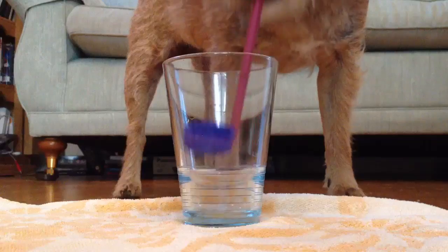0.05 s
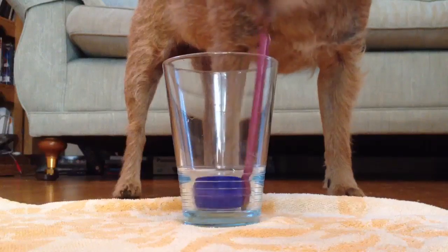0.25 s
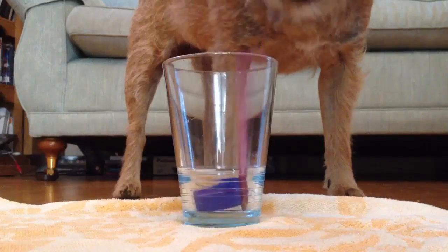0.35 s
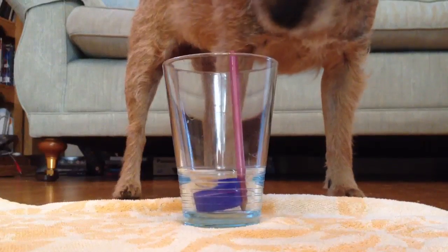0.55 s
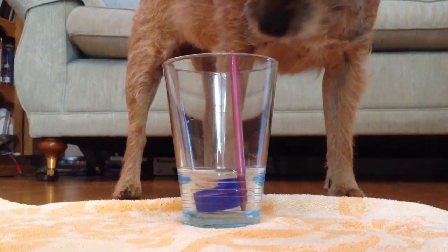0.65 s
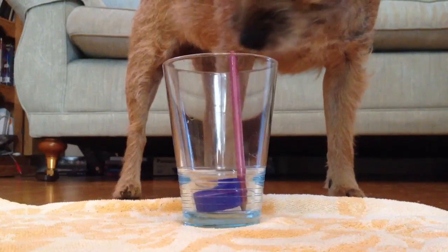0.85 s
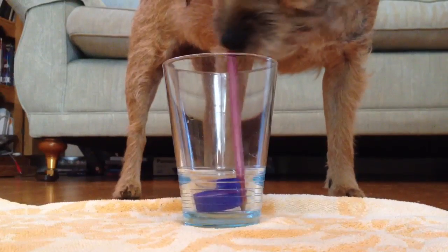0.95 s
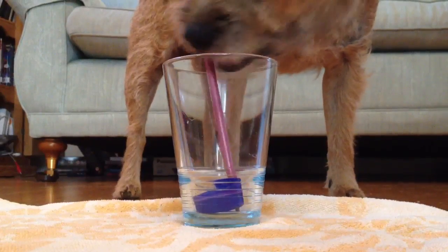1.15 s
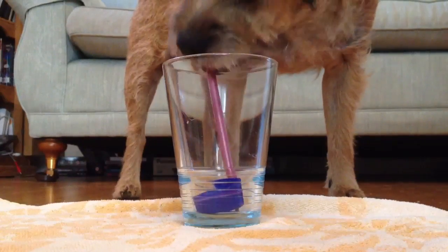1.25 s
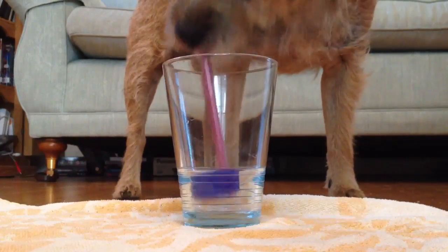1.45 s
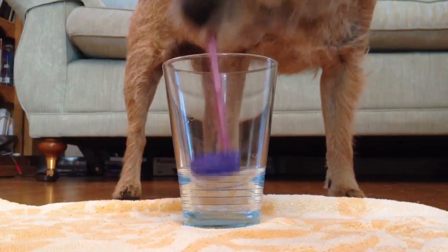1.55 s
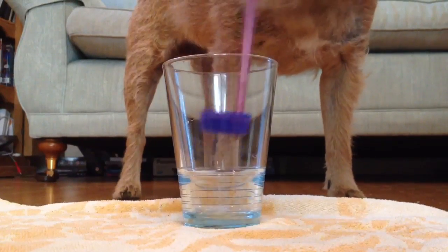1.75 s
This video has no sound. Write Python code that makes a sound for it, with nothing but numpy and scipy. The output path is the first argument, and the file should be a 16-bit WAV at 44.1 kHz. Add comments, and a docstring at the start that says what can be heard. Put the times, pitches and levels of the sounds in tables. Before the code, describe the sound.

A drinking glass clinks brightly at about 0.2 and 0.3 seconds as a plastic stirrer drops in, with hollow rattling, a faint fizz of water and a soft thud. The ringing fades by about 0.8 seconds. A softer clink comes at 1.1 seconds. From 1.4 to 1.8 seconds the stirrer scrapes and ticks lightly up the glass. The sound is close, in a quiet room.

```python
"""A plastic-stemmed stirrer clinks three times against a drinking glass and makes its wall ring. It slides down
the wall with a faint, high fizz, rattles, thuds on the bottom and is drawn out with a light scrape. Each clink
and knock also rings the air in the glass, a short hollow note. The glass stands on a towel, close to the
microphone in a quiet living room."""
import sys
import numpy as np
from scipy import signal
from scipy.fft import rfft, irfft
from scipy.io import wavfile

SR = 44100
rng = np.random.default_rng(int(sys.argv[2]) if len(sys.argv) > 2 else 0)


def digitize_waveform(pressure):
    """Quantize a signal to 16-bit integers and store it at the path in sys.argv[1].

    Rows of a 2-D input are taken as channels; values are limited to [-1, 1].
    """
    field = np.atleast_2d(pressure).T
    bounded = np.clip(field, -1, 1)
    quanta = np.round(bounded * 32767).astype(np.int16)
    wavfile.write(sys.argv[1], SR, quanta)


N = 79380
T = np.arange(N) / SR


def clinks():
    """The struck wall rings with many tones; the spot hit sets two of them, and a soft touch is duller."""
    # hits: t/s, level/dB, lowest tone boost/dB, overtone boost/dB, treble tilt/(dB per kHz), ring time factor
    hits = [(.2011, -0.5, -13.5, 15.5, -0.06, 0.86), (0.3148, 0.5, 2.5, -5, 0.5, 1.007),
            (1.118, -15, 5, 14, -1, 0.91)]
    # tones of the wall, some in close pairs that waver: f/Hz
    glass_hz = [1963.6, 4103.5, 4108.5, 6789, 7348, 8985, 10168, 10143, 12458, 13579, 14109, 14767]
    # strength of each tone: level/dB
    glass_db = [-18, -9.5, -26.5, -20.5, -43, -35, -35, -36.5, -39.5, -45, -31.5, -49]
    # time each tone takes to fade by 60 dB: t60/s
    glass_t60 = [0.63, .29, 0.23, 0.22, 0.288, 0.17, 0.1275, .12, .1, .11, .075, .1]
    # tone colour of the crack at contact: f/Hz, level/dB
    crack_colour = [(300, -20), (800, -8), (1500, -9), (2800, -5.5), (4200, -14), (5400, -8), (7000, -7.5),
                    (10000, -10), (11500, -28), (15000, -27.5)]
    overtone_hz, twin_gap_hz, attack_s = 7348, 2.8, .00025
    out, hz = np.zeros(N), np.array(glass_hz)
    for start, db, low_db, overtone_db, tilt_db, length in hits:
        tilt = lambda f: tilt_db * (f - 4000) / 1000
        levels = np.array(glass_db) + tilt(hz) + low_db * (hz < 3000) + overtone_db * (hz == overtone_hz)
        wall = ring(zip(hz, levels, length * np.array(glass_t60)))
        # a weaker twin of opposite sign makes the lowest tone hold before it fades
        wall -= ring([(hz[0] + twin_gap_hz, levels[0] - 14, length * glass_t60[0])])
        wall *= 1 - np.exp(-T / attack_s)
        crack = undb(-22.5) * burst([(f, level + tilt(f)) for f, level in crack_colour], t60=.038)
        clink = highpass(wall + crack, hz=1400) + undb(-32.5) * air(hz=790)
        out += place(undb(db) * clink, start)
    return out


def knocks():
    """The plastic rattles in dry clicks, each ringing the air in the glass and the stirrer's disc."""
    # knocks: t/s, click level/dB, click centre f/Hz, click t60/s, hollow note level/dB, note f/Hz
    hits = [(.117, -50, 6340, 0.0067, -47.5, 774), (.136, -54, 8200, 0.03, -62, 800),
            (.2215, -30.5, 2500, 0.051, -26, 790), (0.2424, -29, 3100, 0.013, -69, 775),
            (.2668, -28, 2600, 0.046, -16, 820), (.291, -28, 3200, 0.02, -55, 740),
            (.329, -38.5, 870, 0.054, -26.5, 790), (.353, -42.5, 7500, .03, -41, 800),
            (.367, -27.5, 2860, 0.021, -42, 777), (.458, -55, 1500, 0.0075, -40, 802),
            (0.466, -42, 3300, 0.0085, -61.5, 776), (.497, -53, 1030, 0.04, -44, 830),
            (0.9938, -42.5, 1300, 0.015, -55, 700), (1.1045, -43.5, 1500, .01, -49, 750),
            (1.178, -51.5, 980, .02, -47, 790), (1.285, -49, 6520, 0.0059, -62, 695),
            (1.3, -51, 2200, 0.0063, -46, 766), (1.383, -47, 4180, 0.034, -45, 772),
            (1.4161, -40, 5000, .008, -76, 780), (1.5013, -35, 2520, 0.011, -70, 820),
            (1.523, -29.5, 1780, .012, -46, 820), (1.5246, -44, 7600, .007, -74, 810),
            (1.642, -40, 2240, 0.015, -78, 820), (1.6515, -47.5, 3070, .018, -43, 820),
            (1.687, -47, 3130, .012, -44.5, 760), (1.7085, -44.5, 3450, 0.025, -46.5, 780)]
    # tones of the stirrer's plastic disc: f/Hz, level/dB, t60/s
    disc_tones = [(5860, -11.5, 0.016), (4550, -10, .03)]
    width_octaves = .15
    out, disc, bands = np.zeros(N), ring(disc_tones), np.geomspace(50, SR / 2, 40)
    for start, db, hz, t60, air_db, air_hz in hits:
        octaves = np.log2(bands / hz)
        slope = np.where(octaves < 0, 13, 21)  # dB lost per octave below and above the centre
        peak_shape = -slope * (np.hypot(octaves, width_octaves) - width_octaves)
        click = undb(db) * burst(np.c_[bands, peak_shape], t60)
        out += place(click + undb(air_db) * (air(air_hz) + disc), start)
    return highpass(out, hz=750)


def air(hz):
    """The air in the glass rings with a hollow note; its pitch depends on where the stirrer is."""
    # tones of the air: multiple of the note, level/dB, t60/s
    tones = [(1.001, -2.5, 0.0561), (1.05, -13.5, 0.039), (1.441, -13.5, 0.035)]
    attack_s = .00068
    return ring([(hz * multiple, db, t60) for multiple, db, t60 in tones]) * (1 - np.exp(-T / attack_s))


def thuds():
    """A soft push on the bottom rocks the glass on its towel."""
    # landings of the stirrer: t/s, level/dB
    landings = [(0.325, -33), (0.498, -48), (1.102, -49.5), (1.123, -54.5)]
    # low tones of the glass on its towel: f/Hz, level/dB, t60/s
    base_tones = [(195.8, -2, .045), (252, -6, .04), (421.6, -10, 0.028)]
    push_s = .005
    push = T * np.exp(-2 * T / push_s)
    thud = highpass(conv(push, ring(base_tones)), hz=150, order=3)
    thud /= np.abs(thud).max()
    return sum(place(undb(db) * thud, start) for start, db in landings)


def slide():
    """The stirrer scrapes the wall: many tiny slips hiss and ring both stirrer and glass."""
    # strength of the scrape over time: t/s, level/dB
    strength = [(0, -49), (0.038, -59.5), (0.192, -81.5), (.215, -53), (.3, -55), (.38, -58.5), (.48, -63),
                (.6, -80.5), (1.269, -78), (1.401, -60), (1.491, -62.5), (1.535, -54), (1.6, -58.5),
                (1.691, -53.5), (1.75, -66), (1.8, -57.5)]
    # tone colour of the hiss: f/Hz, level/dB
    hiss_colour = [(290, -46.5), (500, -28.5), (552, -15), (788, -2.5), (935, -11.5), (1350, -11.5),
                   (1750, -2.5), (2130, -14), (3050, -2), (3670, -5), (4870, -22.5), (6030, -19),
                   (7790, -10.5), (9510, -21.5), (15000, -35.5)]
    # tones of the rubbed stirrer and glass: f/Hz, level/dB, t60/s
    tones = [(820, 1.5, 0.24), (1848, -2.5, 0.08), (2950, -7.5, 0.028), (3610, -8.5, 0.11),
             (4700, -8, 0.033), (7600, -10.5, 0.02)]
    slips_per_s = 7100
    slips = (rng.random(N) < slips_per_s / SR) * grains()
    times, db = np.array(strength).T
    force = undb(np.interp(T, times, db))
    body = ring(tones)
    ringing = undb(-8.5) * conv(force * unit(slips), body / np.linalg.norm(body))
    return highpass(force * colour(slips, hiss_colour) + ringing, hz=650)


def swishes():
    """The stirrer's rim rubs the wall on its way up: brief swells of thin, high hiss."""
    # swells: middle t/s, half length/s, level/dB, centre f/Hz
    swells = [(1.626, 0.086, -61.5, 4950), (1.745, 0.033, -57.5, 4850)]
    half_width_hz = 280
    out, f = np.zeros(N), np.fft.rfftfreq(N, 1 / SR)
    for middle, half_length, db, hz in swells:
        band = 1 / (1 + ((f - hz) / half_width_hz) ** 2)
        rub = unit(irfft(rfft(rng.standard_normal(N)) * band, N))
        out += undb(db) * rub * np.exp(-((T - middle) / half_length) ** 2)
    return out


def fizz():
    """A faint, high fizz rises as the stirrer slides along the glass."""
    # tone colour of the fizz: f/Hz, level/dB
    fizz_colour = [(3000, -23), (6000, -1.5), (9500, 0), (11500, -10), (13500, 0.5), (15000, -11)]
    middle_s, half_length_s = .29, .075
    swell = np.exp(-((T - middle_s) / half_length_s) ** 2)
    return undb(-53) * colour(grains(), fizz_colour) * swell


def room(x, echo_db):
    """A furnished room adds a short wash of echoes."""
    split_hz, low_t60, treble_t60, delay_s = 8100, .38, .42, .006
    noise = rng.standard_normal(N)
    low = signal.sosfilt(signal.butter(1, split_hz, fs=SR, output="sos"), noise)
    tail = place(low * fade(low_t60) + (noise - low) * fade(treble_t60), delay_s)
    return x + undb(echo_db) * conv(x, tail / np.linalg.norm(tail))


def background():
    """A faint, steady, low rush fills the room."""
    # tone colour of the rush: f/Hz, level/dB
    rush_colour = [(30, -13), (60, -13), (170, -0.5), (320, 2), (500, -5.5), (870, -8.5), (1400, -9.5),
                   (2200, -14), (6000, -14.5), (15000, -21.5)]
    return undb(-64) * colour(rng.standard_normal(N), rush_colour)


def undb(db):
    """Turn decibels into a volume factor."""
    return 10 ** (np.asarray(db) / 20)


def unit(x):
    """Scale a sound to an average strength (rms) of 1."""
    return x / np.sqrt(np.mean(x ** 2))


def conv(x, response):
    """Pass a sound through a body or room, given its response to one tap."""
    return signal.fftconvolve(x, response)[:N]


def place(x, start):
    """Delay a sound to its start time in seconds."""
    return np.concatenate([np.zeros(max(int(round(start * SR)), 0)), x])[:N]


def colour(x, points):
    """Shape a sound's bass and treble by (f/Hz, level/dB) points, then scale it to strength 1."""
    hz, db = np.array(points).T
    f = np.maximum(np.fft.rfftfreq(N, 1 / SR), 1)
    gain = undb(np.interp(np.log(f), np.log(hz), db))
    return unit(irfft(rfft(x) * gain, N))


def fade(t60):
    """Die away by 60 dB every t60 seconds."""
    return np.exp(-np.log(1000) * T / t60)


def ring(tones):
    """A struck body rings as a sum of fading pure tones."""
    return sum(undb(db) * fade(t60) * np.sin(2 * np.pi * hz * T) for hz, db, t60 in tones)


def burst(points, t60):
    """A contact makes a short, noisy crack."""
    return colour(rng.standard_normal(N), points) * fade(t60)


def grains(spread_db=3):
    """Rough noise in which a few grains stand out."""
    return rng.standard_normal(N) * undb(spread_db * np.minimum(rng.exponential(size=N), 4))


def highpass(x, hz, order=2):
    """Turn down everything below hz."""
    return signal.sosfilt(signal.butter(order, hz, "high", fs=SR, output="sos"), x)


def scene():
    """Glass and stirrer sound in the room, over the quiet background."""
    rush = background()
    glass = room(clinks() + thuds(), echo_db=-18.5)
    stirrer = room(knocks() + slide() + swishes() + fizz(), echo_db=-8.5)
    return (glass + stirrer + rush)[None]


def record(dry):
    """The microphone thins the bass and cuts the highest treble."""
    top_hz = 15300
    treble_cut = signal.ellip(8, .2, 70, top_hz, fs=SR, output="sos")
    return signal.sosfilt(treble_cut, highpass(dry, hz=110, order=3))


dry = scene()
out = record(dry)
digitize_waveform(out)
```